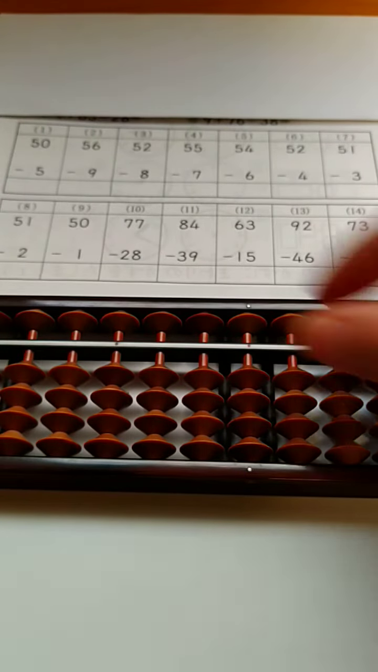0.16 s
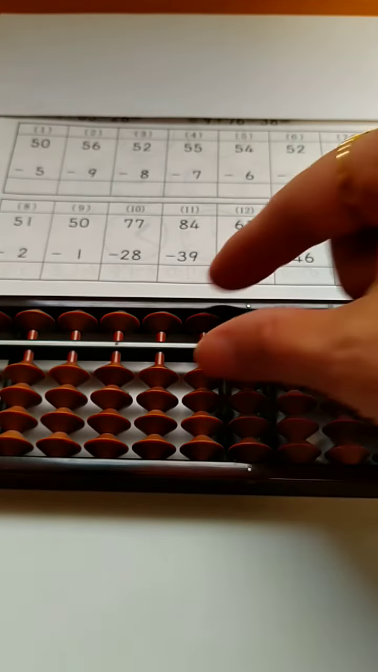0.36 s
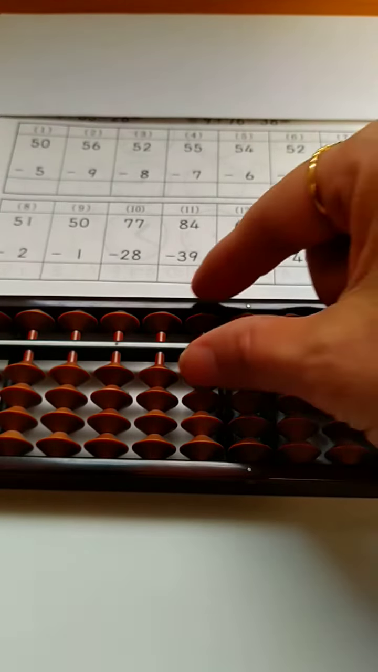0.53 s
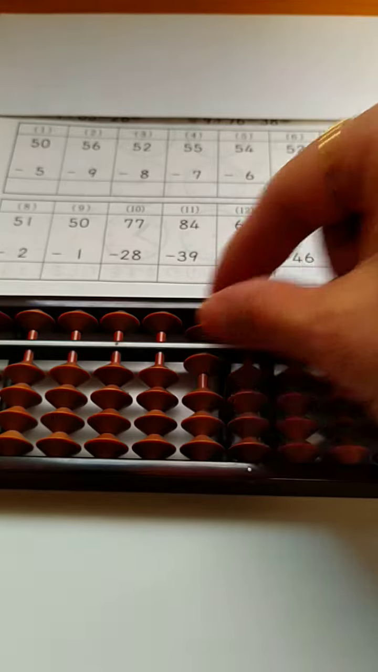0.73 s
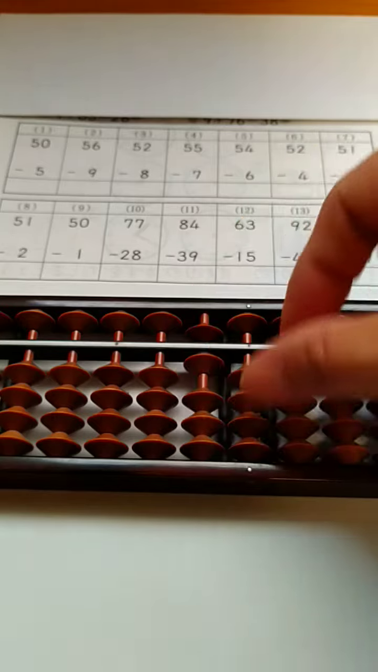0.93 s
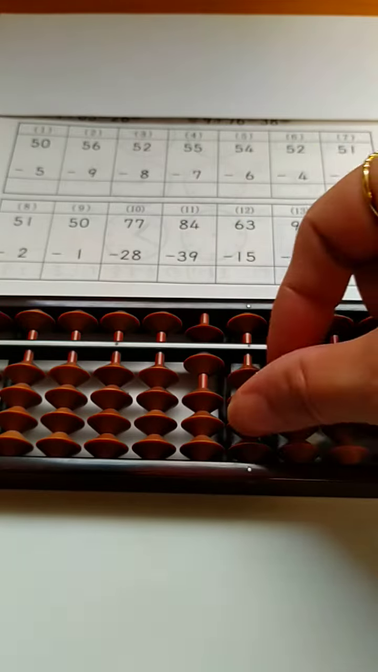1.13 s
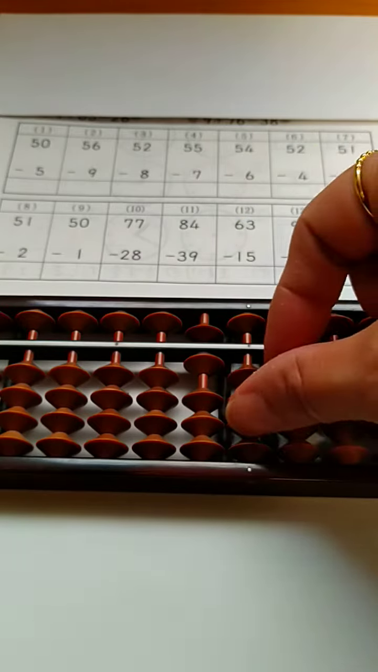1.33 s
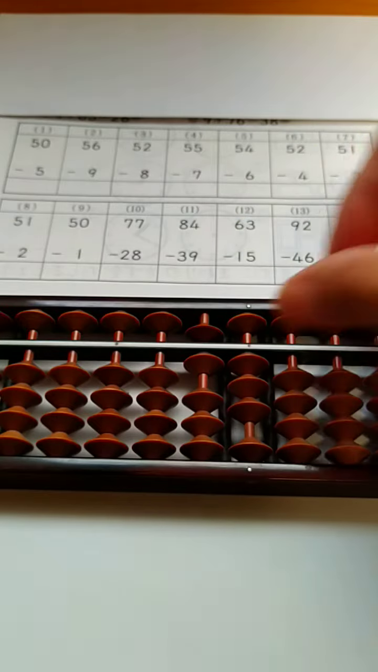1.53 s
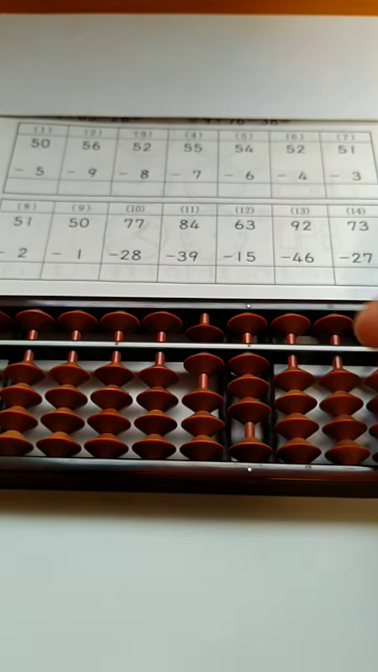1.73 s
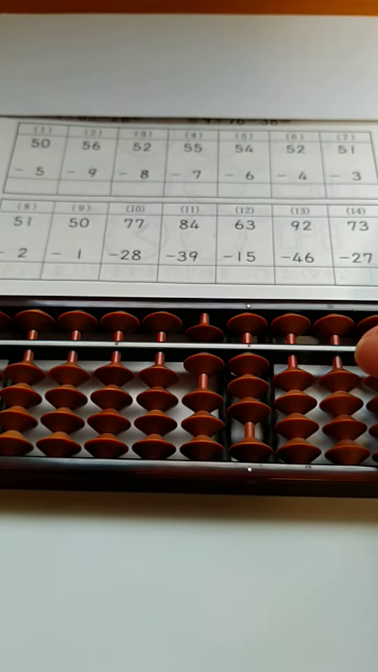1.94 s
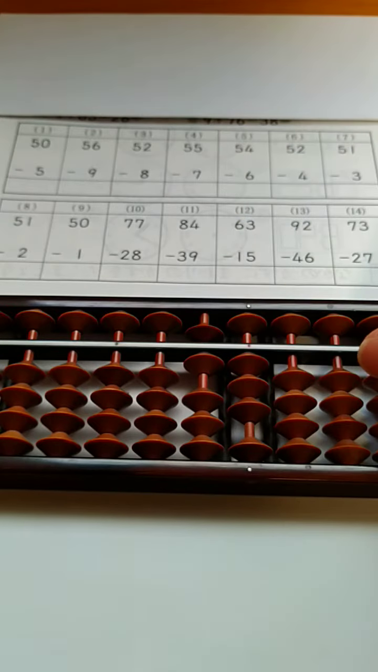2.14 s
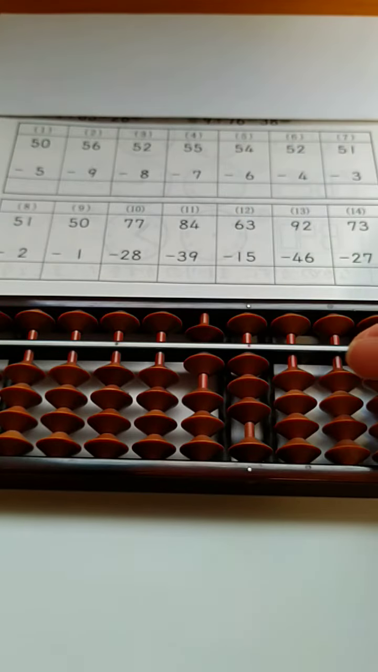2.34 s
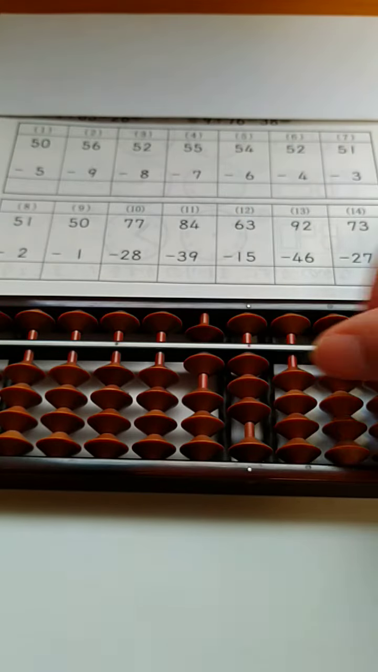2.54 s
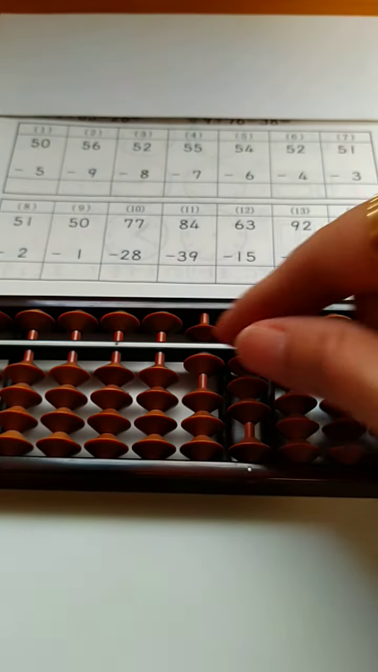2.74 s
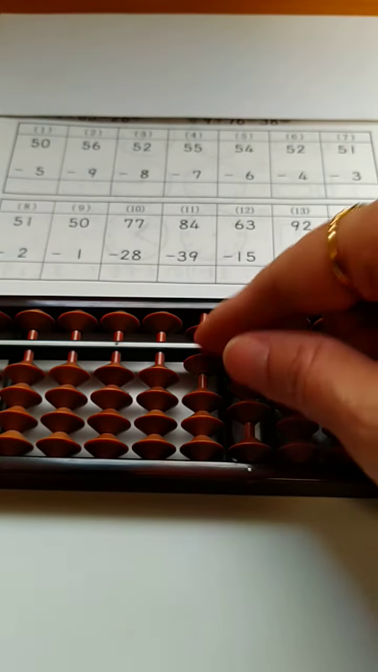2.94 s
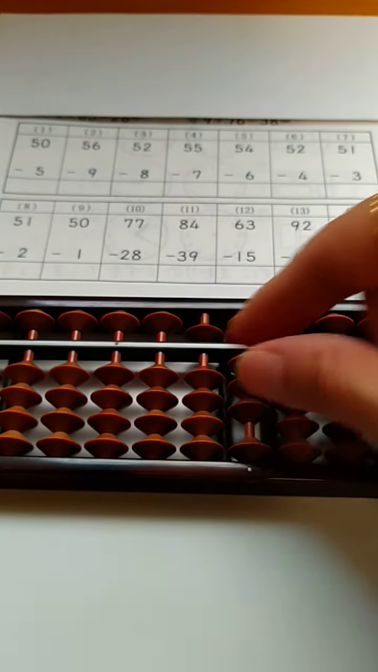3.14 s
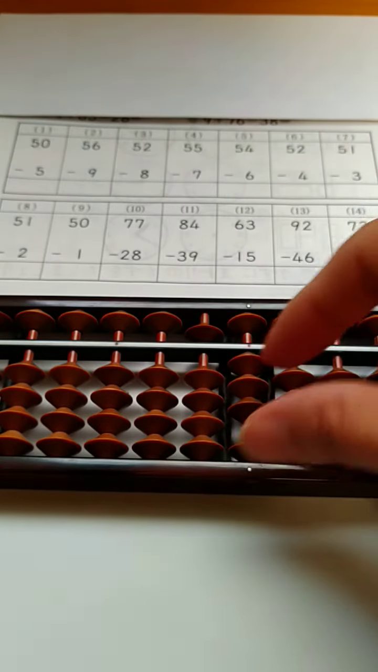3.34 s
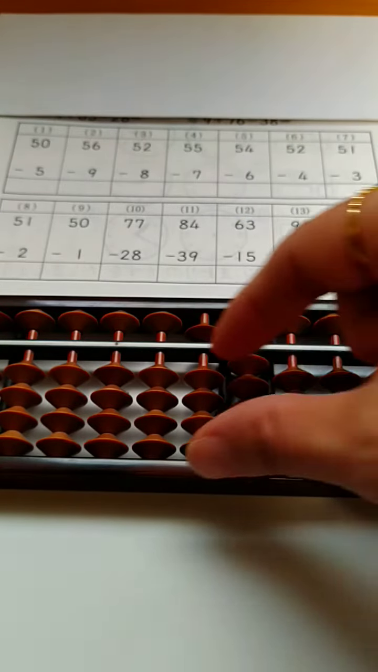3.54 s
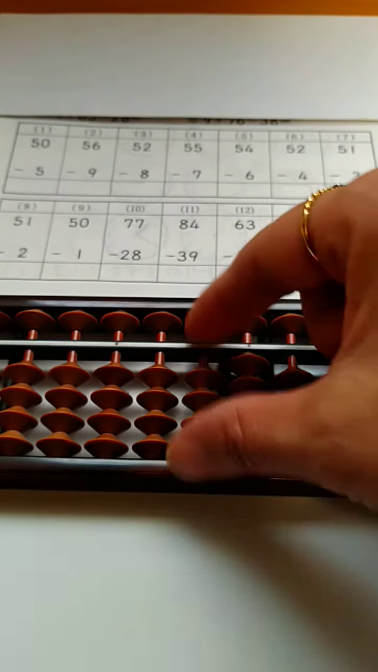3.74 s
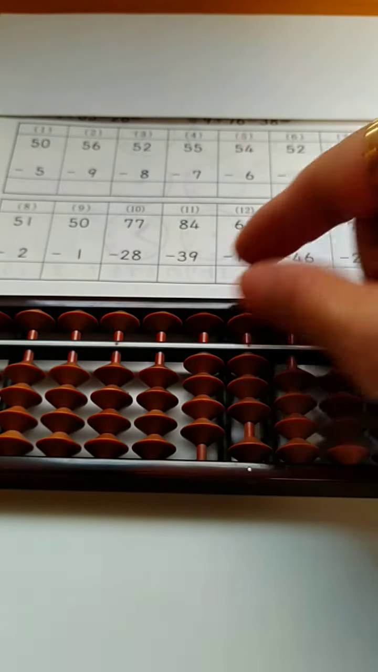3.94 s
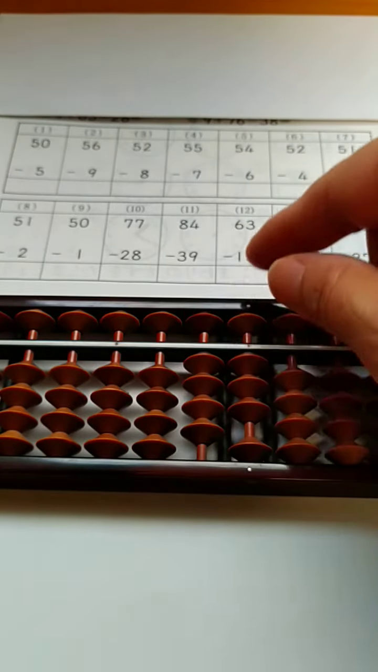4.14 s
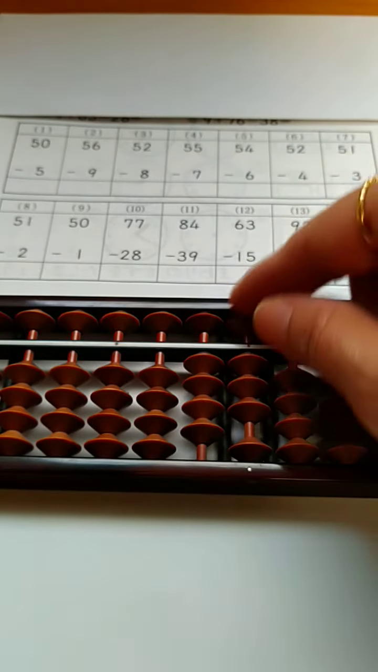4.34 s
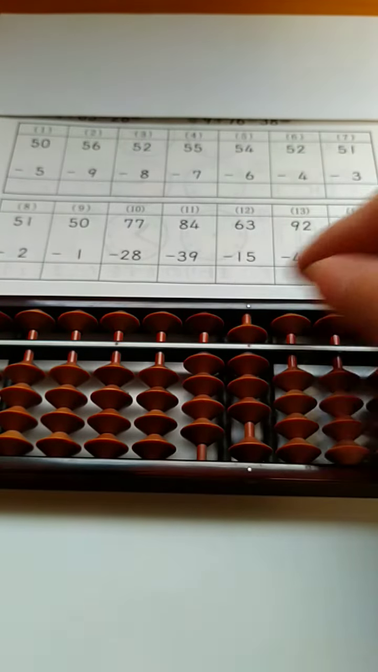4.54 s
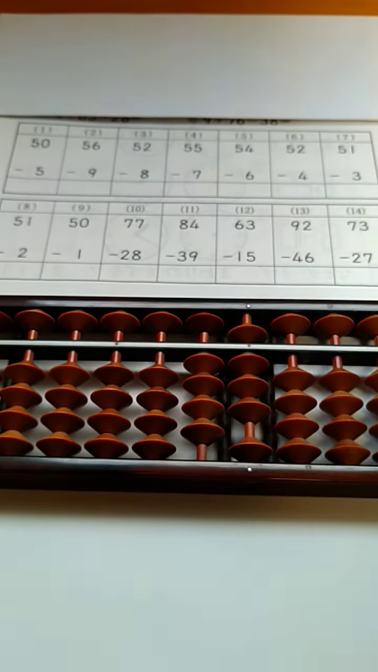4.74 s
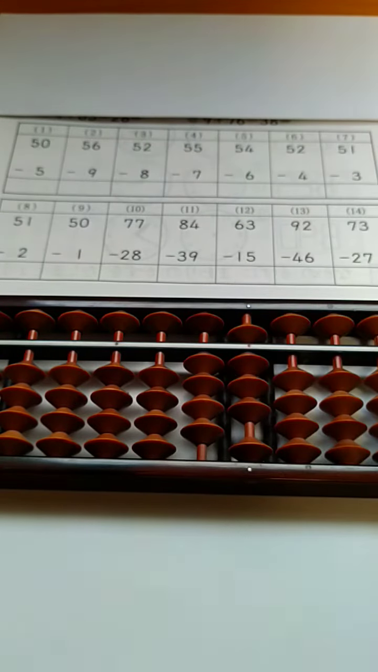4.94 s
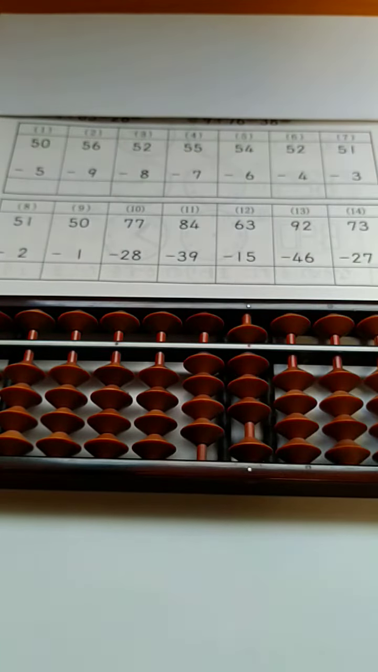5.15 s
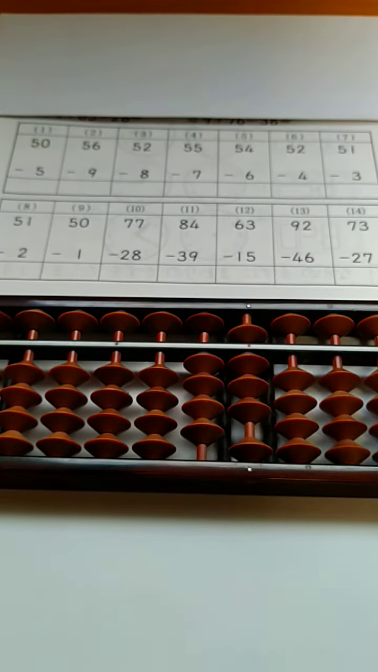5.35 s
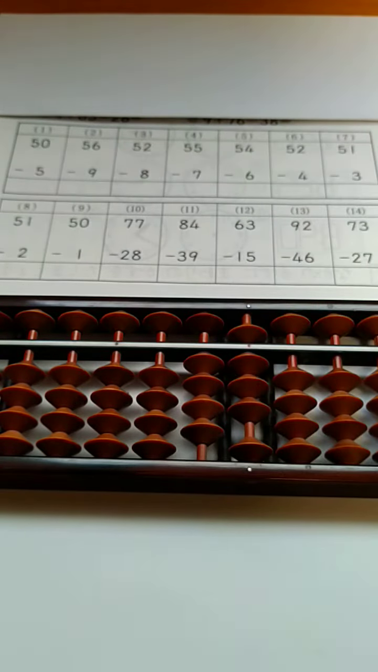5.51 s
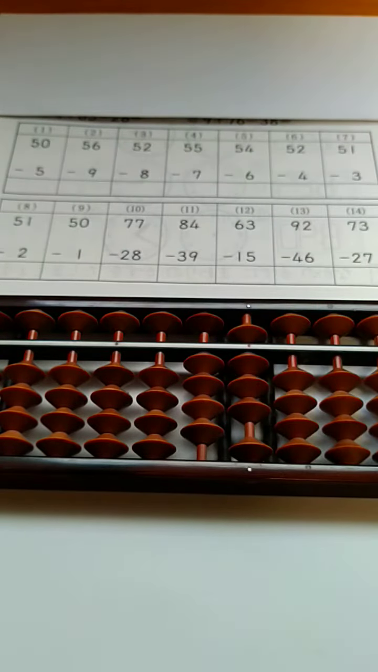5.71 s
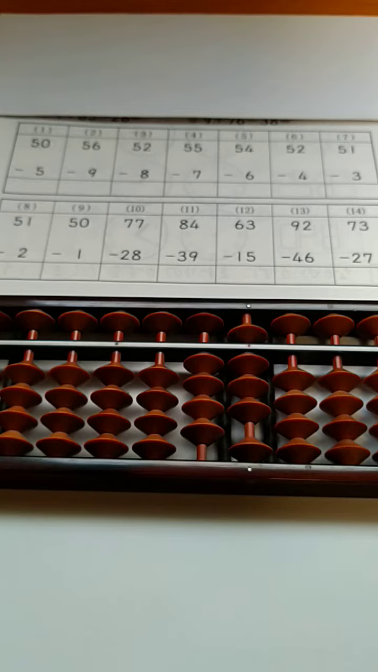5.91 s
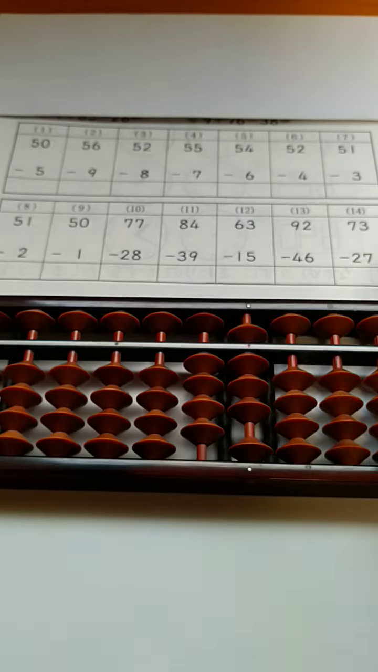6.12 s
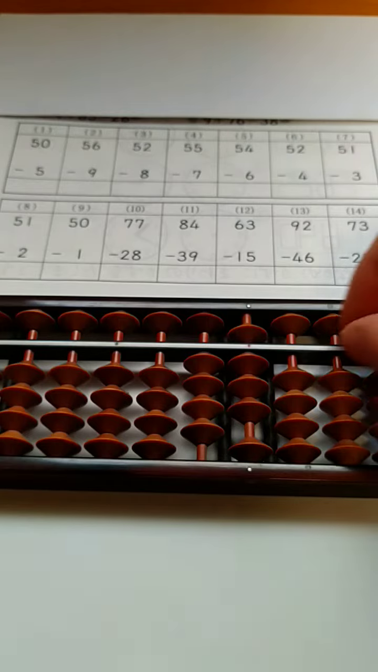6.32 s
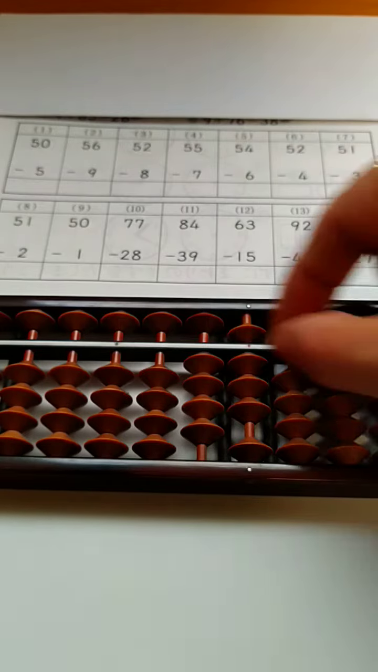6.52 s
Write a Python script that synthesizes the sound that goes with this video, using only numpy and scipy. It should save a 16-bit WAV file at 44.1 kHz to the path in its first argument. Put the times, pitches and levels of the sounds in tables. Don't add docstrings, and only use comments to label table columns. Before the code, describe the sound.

Plastic abacus beads snap sharply against beam and frame in spaced bursts, with tiny rattles and soft desk thuds over a low room hum.

```python
import sys
import numpy as np
from scipy import signal
from scipy.fft import rfft, irfft
from scipy.io import wavfile
from scipy.ndimage import uniform_filter1d

SR = 44100
rng = np.random.default_rng(int(sys.argv[2]) if len(sys.argv) > 2 else 0)


def store_pcm(level_fs):
    pcm = np.round(np.clip(level_fs, -1, 1) * 32767).astype(np.int16)
    wavfile.write(sys.argv[1], SR, np.atleast_2d(pcm).T)


def rack_gain(trim_db):
    fader = np.asarray(trim_db, float)
    return 10 ** (fader / 20)


N = 289996
QUIET_EDGE_HZ, LOUD_EDGE_HZ = 15800, 16900


def evened(x):
    return x / np.sqrt(np.mean(x ** 2) + 1e-20)


def read(points, hz):
    f, value = np.transpose(points)
    return np.interp(np.log(hz + 1), np.log(f + 1), value)


def add(mix, s, sound):
    part = mix[:, round(s * SR):][:, :sound.shape[1]]
    part += sound[:, :part.shape[1]]


def sides(db):
    return rack_gain([[db / 2], [-db / 2]])


def causal(db, size=1024):
    both_halves = np.r_[db, db[-2:0:-1]]
    log_gain = np.log(rack_gain(np.maximum(both_halves, -100)))
    spectrum = np.exp(np.conj(signal.hilbert(log_gain)))
    return np.fft.ifft(spectrum).real[:size]


def peaks(modes, hz):
    return abs(1 + sum(rack_gain(db) / (1 + 2j * (hz - f) / width) for f, width, db in modes))


def noise(gain):
    return irfft(rfft(rng.standard_normal((2, N))) * gain, N)


def ring(hz, t60, rise_s):
    t = np.arange(SR // 4) / SR
    x = (1 - np.exp(-t / rise_s)) * rack_gain(-60 * t / t60) * np.sin(2 * np.pi * hz * t)
    return x / abs(x).max()


def ticks(size, share):
    return rng.standard_normal((2, size)) * (rng.random((2, size)) < share)


def below(x, hz):
    lowpass = signal.firwin(401, hz, window=("kaiser", 9), fs=SR)
    return signal.oaconvolve(x, lowpass[None], "same", axes=1)


# (frequency [Hz], level [dB per Hz])
AIR = [(22, -75), (32, -51), (42, -37.5), (55, -9), (100, -13.5), (155, -17), (190, -10.5), (260, -25),
       (330, -21.5), (600, -32), (1500, -48), (4000, -60)]
# (frequency [Hz], width [Hz], level [dB])
ROOM_MODES = [(58, 15.7, 15), (120, 27.7, 12), (195, 2.5, 14.5), (219.7, 8.8, 23)]
# (time [s], level [dB])
HUM = [(0.0, -61.5), (0.55, -61.5), (1.43, -57.5), (2.31, -61), (2.73, -58), (4.74, -61), (5.75, -59.5),
       (6.15, -60.5), (6.58, -61.5)]
# (frequency [Hz], likeness [0 to 1])
HUM_SAME = [(60, 0.91), (130, 0.97), (290, 0.92), (600, .3)]
# (frequency [Hz], left-right [dB])
HUM_BALANCE = [(60, -2), (160, -9), (270, -4.5), (450, -2)]


def hum():
    hz = np.fft.rfftfreq(N, 1 / SR)
    left, other = rfft(noise(rack_gain(read(AIR, hz)) * peaks(ROOM_MODES, hz)))
    same = np.clip(read(HUM_SAME, hz), 0, 1)
    right = same * left + np.sqrt(1 - same ** 2) * other
    balance = rack_gain(read(HUM_BALANCE, hz) / 2)
    pair = irfft(np.array([left * balance, right / balance]), N)
    s, db = np.transpose(HUM)
    return rack_gain(np.interp(np.arange(N) / SR, s, db)) * evened(pair)


# (frequency [Hz], level [dB per Hz])
HISS = [(100, 10.5), (600, 6), (1200, 3), (2500, 2), (5000, 1), (8000, 1), (10000, 1), (13000, 0),
        (15700, 1.5)]
HISS_DB = [
    [-69.5],
    [-65.5],
]


def hiss():
    colour = rack_gain(read(HISS, np.fft.rfftfreq(N, 1 / SR)))
    return below(rack_gain(HISS_DB) * evened(noise(colour)), QUIET_EDGE_HZ)


# (frequency [Hz], level [dB])
BEAD = [(700, -29.5), (1200, -29), (2000, -28.5), (3800, -19.5), (6000, -14), (8500, -10), (11000, -2.5),
        (14000, -7), (16000, -19.5), (17200, -49)]
# (frequency [Hz], width [Hz], level [dB])
FRAME = [(1114, 31, 4), (2250, 450, 1.5), (2780, 290, -5), (3690, 56, -0.5), (7000, 680, -6),
         (8620, 180, -14.5)]


def bead_colour(body_db, top_db):
    hz = np.fft.rfftfreq(2048, 1 / SR)
    db = read(BEAD, hz) + 20 * np.log10(peaks(FRAME, hz))
    db += (body_db + 27.5) / (1 + (hz / 6500) ** 6)
    top = 1 / (1 + (12000 / (hz + 1)) ** 12)
    side_tops_db = (7, 0)
    return np.array([causal(db + (top_db + 10 + side_db) * top) for side_db in side_tops_db])


def chatter(train, late_ms, rise_ms, chatter_ms):
    def faded(stretch):
        fall = -(abs(late_ms) / (chatter_ms * stretch)) ** 1.5
        return train * np.exp(np.where(late_ms < 0, late_ms / rise_ms, fall))

    body, mid, edge = faded(1.8), faded(1), faded(.45)
    body = body * (1 - .8 * np.exp(-np.maximum(late_ms, 0) / 1.0))
    low = signal.butter(2, 2800, fs=SR)
    top = signal.butter(2, 12300, "high", fs=SR)
    return mid + signal.lfilter(*low, body - mid) + signal.lfilter(*top, edge - mid)


def flattened(burst):
    power = uniform_filter1d(abs(rfft(burst, 2048)) ** 2, size=60)
    db = 10 * np.log10(power + 1e-12)
    return signal.fftconvolve(burst, np.array([causal(-side, size=128) for side in db]), axes=1)


# (time [s], peak [dB], left-right [dB], chatter [ms], body under the tick [dB])
TOUCHES = [(0.361, -43.5, -1, 1.6, 0), (0.401, -48, -13, 2.3, -18), (0.4154, -40.5, 9, 2.2, -18),
           (0.4843, -35, -12, 2, -25), (0.5121, -28, -2, 3.8, -20), (2.8892, -40, -2, 10, -7),
           (3.563, -35.5, -3, 2.7, -16), (3.578, -31, 9, 2.5, -10), (3.6316, -25, -9, 1.4, -25),
           (3.6517, -28, -9, 1.5, -28), (4.1552, -31.5, -4, 0.69, -15), (4.253, -26, -6, 2.8, -23.5),
           (4.4139, -55, 11, 3.1, -30), (6.186, -30.5, -5, 3.8, -19), (6.3286, -22.5, 0, 3.6, -16.5),
           (6.365, -23.5, -4.5, 7.2, -18), (6.4974, -30.5, 6, 7.6, -12)]
# (time [s], peak [dB], left-right [dB], chatter [ms], body and top under the tick [dB])
HITS = [
    (0.437, -13.5, 6, 4, -14.5),
    (0.461, -6, 2, 3.2, -30),
    (1.2192, -4.5, -4, 2.22, -28.5),
    (3.5896, -11.5, -7.5, 4.2, -31.5),
    (3.6087, -7.5, 0.5, 4, -20.5),
    (6.385, -6, 1, 2.3, -29),
    (6.3944, -11, -1, 5.6, -20),
]
SNAPS = [
    (2.8045, -11.5, 1, 4.1, -20),
    (4.1881, -2.5, -1.5, 2.53, -26),
    (6.3075, -21.5, -3.5, 4.9, -22),
    (6.4867, -8.5, -3.5, 2.1, -26),
]


def beads():
    out = np.zeros((2, N))
    t_ms = np.arange(900) / SR * 1000 - 4
    late_ms = t_ms - np.array([[.4], [.6]])
    # 11 dB for a hard hit, 18 dB for a lone, brighter bead
    rows = [row + (row[-1] + 11,) for row in HITS]
    rows += [row + (row[-1] + 18,) for row in SNAPS]
    rows += [row + (-31.5,) for row in TOUCHES]
    for s, db, pan_db, chatter_ms, body_db, top_db in sorted(rows):
        soft = np.clip((-23 - db) / 10, 0, 1)
        train = ticks(len(t_ms), .25)
        train += 6 * (1 - soft) * (abs(late_ms) < 500 / SR)
        rise_ms = np.array([[.05], [.1]]) + 0.64 * chatter_ms * soft
        burst = flattened(chatter(train, late_ms, rise_ms, chatter_ms))
        hit = signal.fftconvolve(burst, bead_colour(body_db, top_db), axes=1)
        hit /= np.sqrt((hit ** 2).sum(1, keepdims=True) / (SR * chatter_ms / 1000))
        add(out, s - .004, rack_gain(db - 15) * sides(pan_db) * hit)
    return out


# (frequency [Hz], t60 [s])
ROOM_T60 = [(1000, 0.32), (3000, 0.18), (7000, 0.25), (12000, 0.15), (16000, 0.16)]


def room(x):
    gap_s, rise_s = .002, .016
    taps = np.zeros((2, SR // 2))
    at = np.arange(0, SR // 2 - 10, 10)
    at = at + rng.integers(0, 10, (2, len(at)))
    strength = rack_gain(4 * rng.standard_normal(at.shape))
    np.put_along_axis(taps, at, rng.choice([-1., 1.], at.shape) * strength, 1)
    hz, t, z = signal.stft(taps, SR, nperseg=128)
    decay = rack_gain(-60 * t / read(ROOM_T60, hz)[:, None])
    tail = signal.istft(z * decay, SR, nperseg=128)[1]
    tail *= np.clip((np.arange(tail.shape[1]) / SR - gap_s) / rise_s, 0, 1)
    return rack_gain(-14.5) * signal.fftconvolve(x, tail / np.linalg.norm(tail[0]), axes=1)[:, :N]


# (frequency [Hz], level [dB], how far it follows the lower mode [0 to 1])
DESK = [(383.4, -2, 0.22), (342.8, -5.5, 0.6), (301, -7, 0.95), (457, -19, 0.36), (114.5, -13, 0.00064),
        (58, -13, 1)]
# (time [s], peak [dB], t60 [s], frame ring [dB])
THUDS = [(0.407, -45, 0.087, -15.5), (0.461, -56.5, 0.43, -7), (0.517, -49, 0.074, -15),
         (1.225, -42, 0.11, 0), (2.778, -60, 0.43, -4), (2.809, -56, 0.29, -10),
         (2.884, -57.5, 0.082, -6.5), (3.543, -66, 0.38, -14), (3.567, -48, 0.32, -12),
         (3.609, -47.5, 0.23, -3), (4.157, -43, 0.19, -15.5), (4.259, -58, 0.25, -7.5),
         (6.187, -53, 0.36, -6), (6.234, -61, 0.18, 0), (6.319, -44, 0.13, -7), (6.371, -47.5, 0.17, -11),
         (6.401, -47.5, 0.29, -7.5), (6.449, -51.5, 0.6, -11), (6.492, -41.5, 0.082, -6.5),
         (6.527, -50.5, 0.086, -27)]


def thuds():
    out = np.zeros((2, N))
    low_mode_db = -6
    for s, db, t60, frame_db in THUDS:
        thud = 0
        for hz, mode_db, follow in DESK:
            gain = rack_gain(mode_db + follow * low_mode_db) * rng.choice([-1, 1])
            thud = thud + gain * ring(hz * rng.uniform(0.93, 1.03), t60, 0.0044)
        frame_hz = 1150 + 33.5 * frame_db
        thud += rack_gain(frame_db - 6) * ring(frame_hz, t60=.035, rise_s=.0008)
        add(out, s - .003, rack_gain(db) * sides(-4.5) * thud)
    return out


# (time [s], bead ring [dB], bead [Hz], rod [Hz])
RINGS = [(.437, -24, 7980, 4550), (0.46, -46, 7560, 4900), (1.219, -25, 8100, 2700),
         (1.2206, -33, 4020, 5950), (2.805, -30, 8800, 2910), (2.8045, -44, 5100, 2290),
         (3.59, -27, 7700, 2920), (3.609, -26, 6200, 2250), (4.188, -25.5, 7200, 3930),
         (6.387, -26, 7900, 3140), (6.395, -42, 6800, 2250), (6.487, -33, 7800, 3950)]


def rings():
    out = np.zeros((2, N))
    t = np.arange(130) / SR
    for s, db, bead_hz, rod_hz in RINGS:
        modes = ring(bead_hz, t60=0.0067, rise_s=0.00024)
        modes += rack_gain(-15) * ring(rod_hz, t60=.016, rise_s=0.00042)
        contacts = 0.26 * ticks(len(t), 0.016) * np.exp(-t / 0.0048) + (t == 0)
        add(out, s + .0005, rack_gain(db) * signal.fftconvolve(modes[None, :2000], contacts, axes=1))
    return out


# (time [s], length [s], cut at 0.125 s, level [dB])
RATTLES = [
    (0.466, 0.078, -59.5),
    (2.864, 0.058, -72),
    (3.612, 0.1, -64.5),
    (4.193, 0.11, -64.5),
    (6.279, 0.0097, -68.5),
    (6.333, 0.045, -64),
    (6.401, 0.2, -56.5),
    (6.505, 0.14, -63),
]


def rattles():
    out = np.zeros((2, N))
    colour = bead_colour(body_db=-15.5, top_db=-39)
    for s, length, db in RATTLES:
        train = ticks(SR // 8, 0.039)[:, :round(length * SR)]
        train = train * signal.windows.tukey(train.shape[1], .6)
        add(out, s, rack_gain(db) * evened(signal.fftconvolve(train, colour, axes=1)))
    return out


# (time [s], peak [dB], pitch [Hz], ring t60 [s])
KNOCKS = [(1.595, -56.5, 502, 0.017), (1.596, -67, 1150, 0.01), (1.606, -64, 1030, .012),
          (1.628, -67, 2150, 0.0069), (1.748, -65, 428, 0.093), (1.746, -69, 1130, .012),
          (1.779, -65, 1170, .012), (2.17, -67, 1500, 0.0089), (3.207, -66.5, 1980, 0.01),
          (4.947, -61.5, 420, 0.025), (4.978, -61, 386, 0.017), (4.98, -63, 1240, 0.0031),
          (5.093, -64, 2250, .008), (5.285, -70, 1900, 0.0068), (5.61, -68, 1900, .008),
          (5.816, -57, 1910, 0.0035), (5.816, -52.5, 563, 0.05)]


def knocks():
    out = np.zeros((2, N))
    t = np.arange(2600) / SR
    for s, db, hz, t60 in KNOCKS:
        smear = ticks(len(t), 0.076) * np.exp(-(t / 0.012) ** 2)
        shared = smear + .5 * smear[::-1]
        puff = signal.fftconvolve(ring(hz, t60, 0.23 * t60)[None], shared, axes=1)
        add(out, s, rack_gain(db) * sides(4.5) * puff / abs(puff).max(1, keepdims=True))
    return out


# (time [s], peak [dB], frequency [Hz], t60 [s])
SWAYS = [
    (2.799, -54, 58, 0.94),
    (4.161, -60, 70, 0.67),
    (6.311, -49, 120, 0.052),
    (6.41, -51.5, 61, 0.17),
    (6.51, -51, 62.3, 0.2),
]


def sways():
    out = np.zeros((2, N))
    for s, db, hz, t60 in SWAYS:
        add(out, s, rack_gain(db) * sides(-4.5) * ring(hz, t60, rise_s=0.0046))
    return out


def scene():
    clicks = beads() + rings()
    quiet = below(room(clicks) + rattles(), QUIET_EDGE_HZ)
    return clicks + quiet + thuds() + sways() + knocks() + hum()


# (frequency [Hz], width [Hz], level [dB])
PORTS = [
    [(11540, 640, 9), (15000, 740, -7)],
    [(10640, 540, 5.5), (14600, 660, -19)],
]


def microphone_ports(x):
    hz = np.fft.rfftfreq(2048, 1 / SR)
    ports = np.array([causal(20 * np.log10(peaks(port, hz))) for port in PORTS])
    return signal.oaconvolve(x, ports, axes=1)[:, :N]


def low_pass(x):
    return signal.sosfilt(signal.butter(12, 17350, fs=SR, output="sos"), x)


def record(dry):
    heard = microphone_ports(dry + hiss())
    return low_pass(below(heard, LOUD_EDGE_HZ))


dry = scene()
out = record(dry)
store_pcm(out)
```